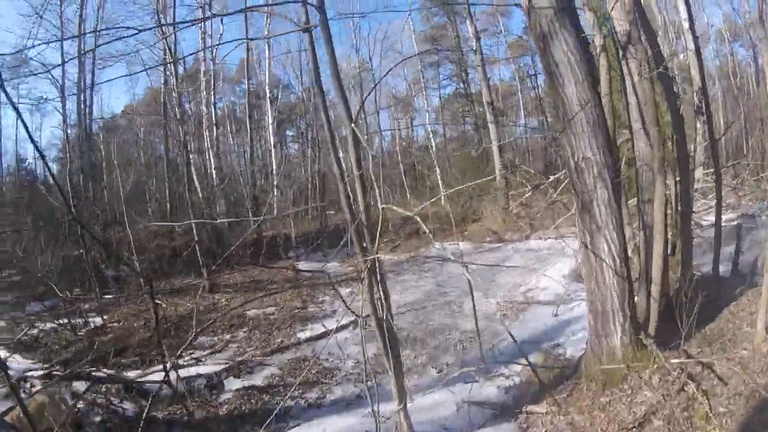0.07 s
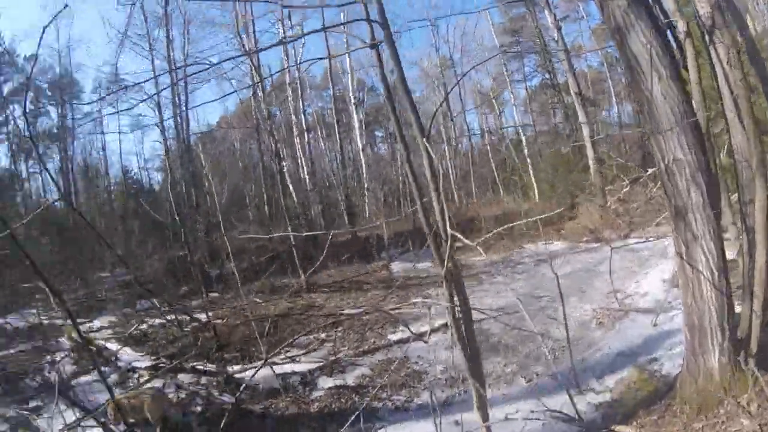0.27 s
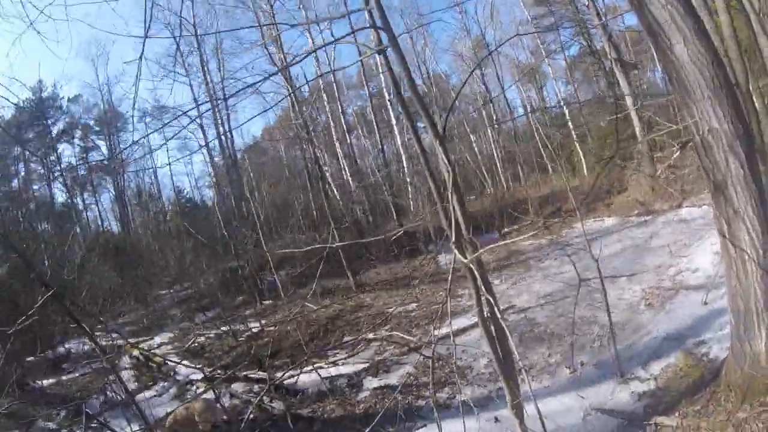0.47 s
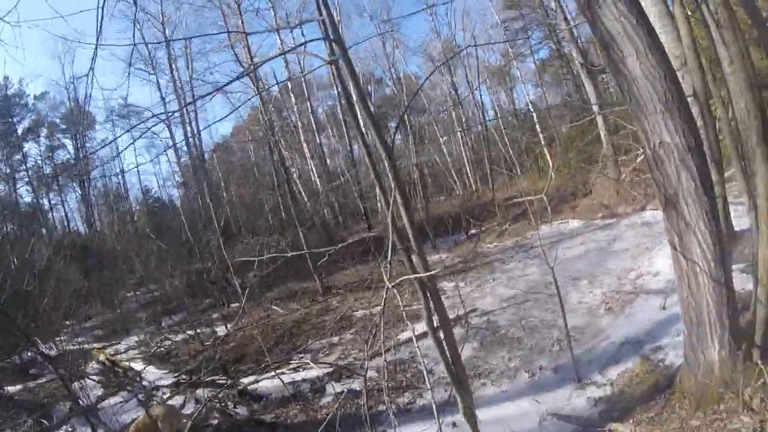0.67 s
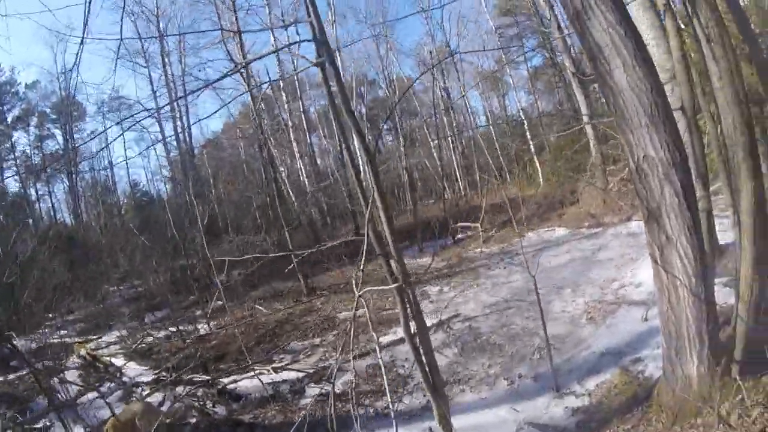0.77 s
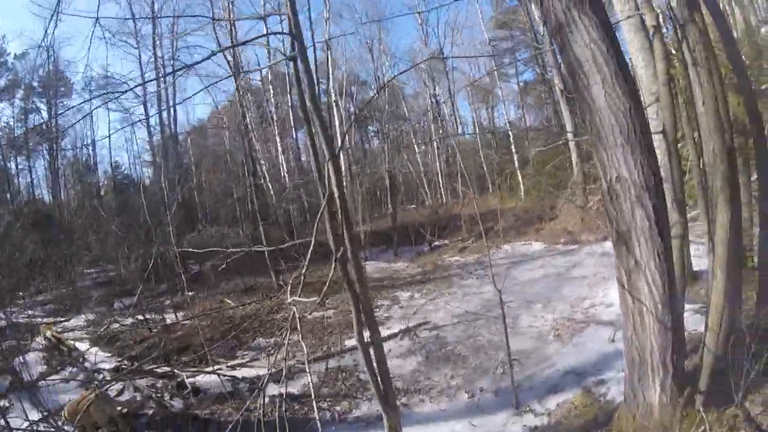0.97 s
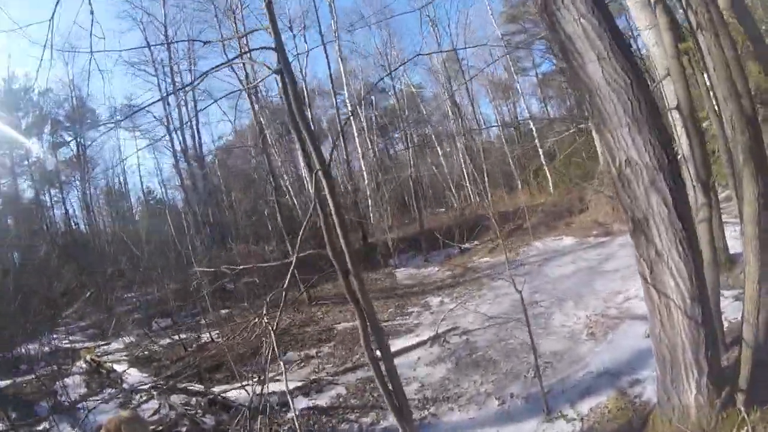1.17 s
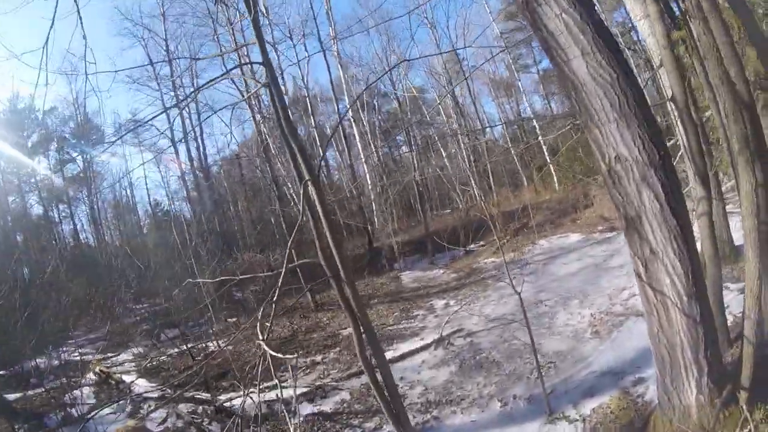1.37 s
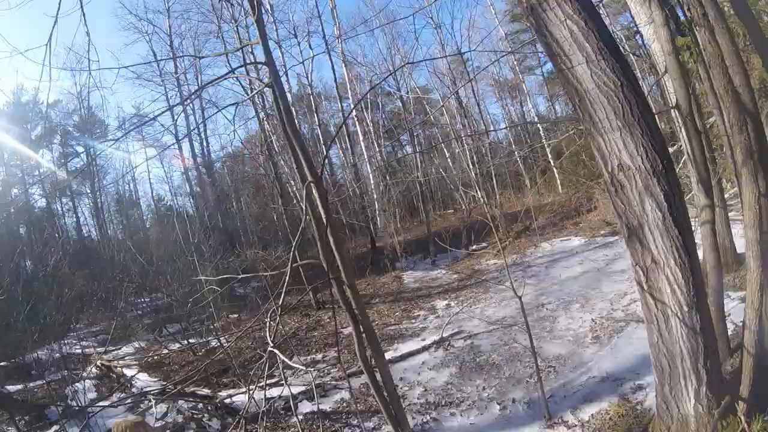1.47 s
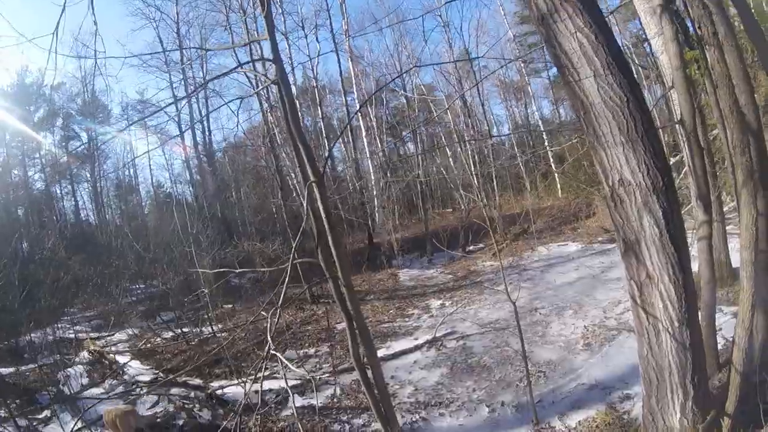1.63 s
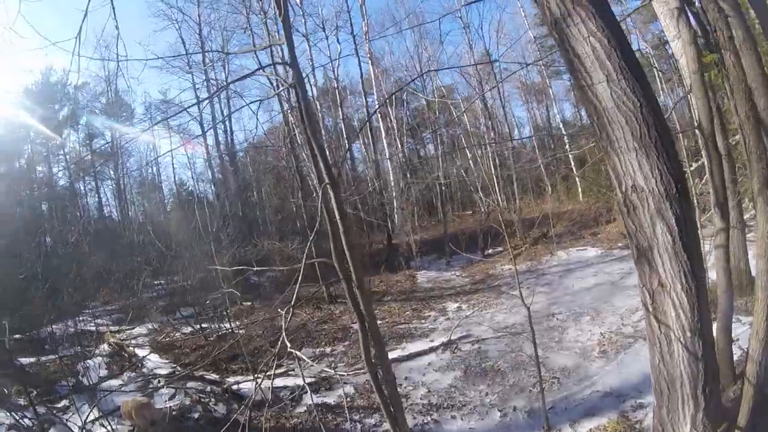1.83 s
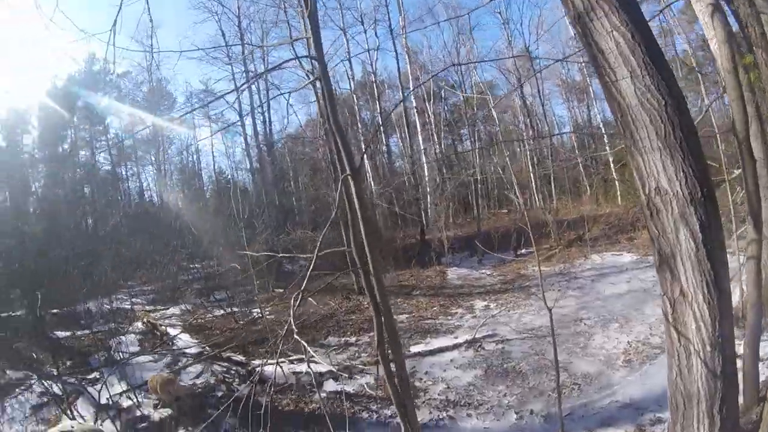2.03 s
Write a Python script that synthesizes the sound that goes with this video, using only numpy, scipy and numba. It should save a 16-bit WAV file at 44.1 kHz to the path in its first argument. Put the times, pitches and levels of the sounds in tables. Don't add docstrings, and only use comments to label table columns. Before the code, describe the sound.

Slow footsteps crunch crusted snow and dry leaves in quiet woods. Low handling thumps come around 0.1 s. At 0.25 s a step lands with a sharp snap and hollow pole clunk, then grainy crunching and rubbing until 0.55 s. A second step crackles from 0.8 to 1.1 s; thin ice cracks near 1.2 s. Sparse ticks follow, with a small knock at 1.85 s and soft thumps near 2 s.

```python
import sys
import numpy as np
from scipy import signal
from scipy.fft import rfft, irfft
from scipy.io import wavfile
from numba import njit

SR = 44100
rng = np.random.default_rng(int(sys.argv[2]) if len(sys.argv) > 2 else 0)


def linear_from_db(decibels):
    return 10 ** (np.asarray(decibels, float) / 20)


def materialize(psi):
    bounded = np.clip(np.atleast_2d(psi).T, -1, 1)
    quanta = np.round(bounded * 32767).astype(np.int16)
    wavfile.write(sys.argv[1], SR, quanta)


N = 92610


def rms_one(x):
    return x / np.sqrt(np.mean(x ** 2) + 1e-20)


def in_time(rows):
    s, *columns = np.transpose(rows)
    return [np.interp(np.arange(N) / SR, s, column) for column in columns]


def colour(x, points):
    hz, db = np.transpose(points)
    log_hz = np.log(np.maximum(np.fft.rfftfreq(N, 1 / SR), 1))
    knots_hz = [hz[0] / 2, *hz, hz[-1] * 2]
    shape_db = np.interp(log_hz, np.log(knots_hz), [db[0] - 40, *db, db[-1] - 40])
    return rms_one(irfft(rfft(x) * linear_from_db(shape_db), N))


def band(x, low_hz, high_hz):
    return signal.sosfilt(signal.butter(2, [low_hz, high_hz], "band", fs=SR, output="sos"), x)


def drift(rate_hz):
    r = np.exp(-2 * np.pi * rate_hz / SR)
    return rms_one(signal.lfilter([1], [1, -2 * r, r * r], rng.standard_normal(N + SR))[SR:])


def grains(per_s, spread_db):
    chance, size, side = rng.random((3, N))
    size_db = spread_db * np.minimum(-np.log(size + 1e-9), 4)
    return (chance < per_s / SR) * linear_from_db(size_db) * np.sign(side - .5)


def ring(x, hz, t60_s):
    r, w = linear_from_db(-60 / (t60_s * SR)), 2 * np.pi * hz / SR
    return signal.lfilter([0, np.sin(w)], [1, -2 * r * np.cos(w), r * r], x + 1e-18)


@njit
def ring_held(x, r, w):
    out = np.zeros(len(x))
    for i in range(2, len(x)):
        out[i] = np.sin(w[i]) * x[i - 1] + 2 * r[i] * np.cos(w[i]) * out[i - 1] - r[i] * r[i] * out[i - 2]
    return out


def burst(s, db, t60_s, low_hz, high_hz):
    lift_db, crack = 2.5, 6.16
    t, i = np.arange(3000) / SR, int(s * SR)
    crumble = rng.standard_normal(len(t)) * linear_from_db(-60 * t / t60_s)
    crumble[0] = crack
    noise = band(crumble, low_hz, high_hz)
    out = np.zeros(N + SR)
    out[i:i + len(t)] = linear_from_db(db + lift_db) * noise / np.abs(noise).max() / 2
    return out[:N]


def air():
    # frequency in Hz, density in dB per Hz.
    air_spectrum = [(150, -28), (260, -1.5), (395, -5.5), (4210, -17), (6500, -15.5), (12700, -28.5),
                    (14300, -41)]
    level_db = -59 + 0.54 * drift(15)
    return linear_from_db(level_db) * colour(rng.standard_normal(N), air_spectrum)


def hand():
    # time in seconds, level in dB.
    shake = [(0, -66), (.08, -43), (.13, -26), (.2, -46), (.3, -36), (.47, -35), (.65, -44), (.78, -46.5),
             (.88, -37), (1.0, -44), (1.1, -35), (1.25, -39), (1.38, -48.5), (1.5, -53.5), (1.75, -52.5),
             (1.93, -49), (2.0, -40), (2.1, -42)]
    # start in seconds, peak in dB, length in seconds, direction (+1 push, -1 pull).
    thumps = [(0.091, -22.5, 0.0034, -1), (0.113, -21.5, 0.0075, -1), (0.140, -16.5, 0.01, -1),
              (0.159, -25, 0.013, -1), (1.409, -26, 0.012, 1), (1.918, -24.5, 0.0096, 1),
              (1.9715, -21.5, 0.0051, -1), (1.987, -28, 0.0086, -1), (2.002, -29, 0.0072, -1),
              (2.049, -21, 0.0082, 1), (2.074, -28, 0.011, -1)]
    lump_db, low_hz, top_hz = 3.5, 27, 117.3
    shake_db, = in_time(shake)
    white = rng.standard_normal(N + SR)
    rumble = rms_one(band(band(white, low_hz, top_hz), 2.6, 277)[SR:])
    out = linear_from_db(shake_db - 1 + lump_db * drift(5.4)) * rumble
    t = np.arange(N) / SR
    for s, peak_db, length_s, direction in thumps:
        u = np.clip((t - s) / length_s, 0, 2)
        pulse = np.sin(np.pi * u) * np.sin(np.pi * u / 2) * np.exp(-.6 * u)
        out += np.sign(direction) * linear_from_db(peak_db) * pulse
    return out


def squeeze():
    # time in seconds, loss of upper modes in dB, loss of low modes in dB.
    grips = [(0.267, 14, 2), (.31, -6, -4.5), (0.353, 9, 10), (.41, -3, 0.5), (0.456, 3, 2.5),
             (0.504, 13, 0.5), (0.825, 7.5, 19), (0.932, 9, 6), (1.0, 5, 5), (1.066, 20, 10),
             (1.131, 8, -5), (1.165, 8, -2), (1.252, 11, 2)]
    width_s = 0.004
    t = np.arange(N) / SR
    bumps = np.array([np.exp(-.5 * ((t - s) / width_s) ** 2) for s, *loss in grips])
    bumps /= width_s * SR * np.sqrt(2 * np.pi)
    return np.maximum(np.transpose(grips)[1:], 0) @ bumps


def pole():
    # frequency in Hz, level in dB, t60 in seconds.
    modes = [(113.2, -13, 0.32), (182.8, -8.5, 0.52), (233.8, 1.5, 0.19), (284, 1, 0.1), (462.9, -3, 0.23),
             (449, -16.5, 0.23), (620, -6.5, 0.029), (721, -8.5, 0.05), (898, -16.5, 0.071),
             (1040, -11.5, 0.021), (1253, -19, 0.037), (1754, -14, 0.056), (2020, -22.5, 0.044),
             (2460, -13, 0.028)]
    # time in seconds, peak in dB, low end relative in dB, top end relative in dB.
    jolts = [(0.244, -9.5, -1.5, 2), (0.278, -11.5, -1, 8), (0.348, -27, -12, -4), (0.364, -20, -22, -26),
             (0.389, -20, -22, 12), (0.417, -31.5, -18, 13), (0.44, -40, -16, 15), (0.45, -25.5, 2, 8),
             (0.461, -15.5, -31, 3.5), (0.472, -15.5, -21, -5), (0.513, -33, -17, -28),
             (0.812, -18, -11.5, 9.5), (0.868, -36.5, -16, 12), (0.882, -20, -14, -6),
             (0.899, -24, -9.5, -16), (0.92, -22, -22, 4.5), (1.022, -25.5, -26, 11.5),
             (1.091, -11.5, -56, 6.5), (1.135, -24, -14, 4), (1.194, -27.5, -14, 10),
             (1.206, -22.5, -12.5, -2), (1.2169, -23, -10.5, -2), (1.262, -37.5, -0.5, 11),
             (1.715, -39, -14, -3), (1.765, -38.5, -25, 0), (1.8572, -22, -13, 1.5)]
    # time in seconds, level in dB, hum and top end relative in dB.
    rub = [(0, -67.5, 3, -2), (.16, -49, 16, 10.5), (.2, -65, -3, 23), (.25, -39, 11, 18),
           (.38, -24.5, -2, 5), (.44, -41, 8, 18), (.47, -41.5, 6, 24.5), (.51, -84, 3, -18),
           (.68, -61, 12, 13), (.79, -48.5, 5.5, -5), (.9, -31.5, 2, 8.5), (.98, -38.5, -3, 5),
           (1.07, -38.5, 5, 10.5), (1.215, -41, -6.5, 6), (1.36, -55, 1.5, 17), (1.42, -78, 7, 16.5),
           (1.75, -55, 6.5, 14.5), (1.85, -68.5, 15, 26)]
    # time in seconds, level in dB.
    plucks = [
        (.246, -8.5),
        (.362, -12),
        (0.469, -21),
        (.885, -26),
        (1.096, -22),
    ]
    hum_hz, low_end_hz, top_end_hz, thin_hz = 200, 330, 560, 1200
    jolt_lift_db, jolt_spread_db, jolt_cut_hz = -2, 1.5, 603
    hum_jolt_db, thin_jolt_db = -6.5, -1
    rubs_per_s, rub_spread_db, rub_body_db, thin_rub_db = 700, 5, -7, 4.5
    wobble, wobble_hz = 0.01, 7

    s, jolt_db, low_db, top_db = np.transpose(jolts)
    rub_db, rub_hum_db, rub_top_db = in_time(rub)
    rubs = [rms_one(grains(rubs_per_s, rub_spread_db)) * linear_from_db(rub_db - 25 + 0.28 * drift(34))
            for side in range(2)]
    chance = rng.standard_normal((len(s), len(modes)))
    upper_loss_db, low_loss_db = squeeze()
    wander = 1 + wobble * drift(wobble_hz)
    out, sign, last_hz = np.zeros(N), 1, 1
    for k, (hz, mode_db, t60_s) in enumerate(modes):
        low, top = 150 < hz < low_end_hz, hz > top_end_hz
        hum, thin = low and hz < hum_hz, hz > thin_hz
        if hz < hum_hz:
            share_db = rub_hum_db
        elif low:
            share_db = rub_body_db
        else:
            share_db = top * rub_top_db + thin * thin_rub_db
        drive = rubs[k % 2] * linear_from_db(share_db)
        hit_db = jolt_db + jolt_lift_db + low * low_db + top * top_db
        hit_db = hit_db + hum * hum_jolt_db + thin * thin_jolt_db + jolt_spread_db * chance[:, k]
        drive[(s * SR).astype(int)] -= linear_from_db(hit_db)
        for pluck_s, pluck_db in plucks:
            drive[int(pluck_s * SR)] += hum * linear_from_db(pluck_db)
        if hz > 1.1 * last_hz:
            sign = -sign
        last_hz = hz
        loss_db = low_loss_db if hz < low_end_hz else upper_loss_db
        decay = linear_from_db(-60 / (t60_s * SR) - loss_db)
        out += sign * linear_from_db(mode_db) * ring_held(drive, decay, 2 * np.pi * hz / SR * wander)
    return signal.lfilter(*signal.butter(1, jolt_cut_hz, fs=SR), out)


def plate():
    # time in seconds, level in dB.
    cracks = [
        (1.193, -24),
        (1.203, -26),
        (1.213, -35.5),
        (1.226, -33.5),
        (1.237, -38.5),
    ]
    # frequency in Hz, level in dB, t60 in seconds.
    plate_modes = [(2434, 6.5, 0.019), (3970, -2, 0.0079), (1693, -1, 0.031), (5170, -5, 0.008),
                   (1327, -3, 0.033)]
    s, db = np.transpose(cracks)
    clicks = np.zeros(N)
    clicks[(s * SR).astype(int)] = linear_from_db(db - 4.5)
    out = np.zeros(N)
    for k, (hz, mode_db, t60_s) in enumerate(plate_modes):
        out += (-1) ** k * linear_from_db(mode_db) * ring(clicks, hz, t60_s)
    return out


def snaps():
    # time in seconds, dull peak in dB, bright relative in dB, dull pitch in octaves above 1 kHz.
    breaks = [(0.1343, -34, 11, 0.89), (0.2451, -19, 0, 1.35), (0.2777, -15, -17, 0.98),
              (0.373, -25.5, -3, 1.9), (0.4184, -21, 8.5, 0.97), (0.4605, -26, -28, 0.79),
              (0.5187, -27, -0.5, 1.76), (0.5407, -26.5, 2.5, 0.4), (0.8109, -15.5, -12.5, 1.38),
              (0.812, -19, -39, 0.4), (0.822, -47, -29, 1.5), (0.8294, -30.5, -21, 1.6),
              (0.872, -43, 9, 1.3), (0.8897, -23, -5, 0.96), (0.9182, -24, 1, 0.79), (0.951, -28, 9.5, 2.2),
              (1.092, -18.5, -16, 0.9), (1.265, -25.5, -22, 1.1), (1.2805, -37.5, 9, 1.4),
              (1.2913, -31.5, -4, 1.9), (1.3084, -45.5, 24, 1.0), (1.6557, -37, 19, 0.98),
              (1.8403, -31.5, 2.5, 2.13), (1.858, -28.5, -25, 0.97), (1.9992, -30, -1.5, 1.03)]
    # time in seconds, peak in dB, pitch in Hz.
    ticks = [(0.323, -23, 1980), (.410, -22, 5400), (.435, -17.5, 2800), (.493, -21, 8500),
             (.521, -35, 1300), (0.598, -33, 3565), (.702, -24.5, 4900), (0.7303, -26.5, 2950),
             (.780, -25.5, 2780), (.854, -48, 5420), (0.883, -20, 2500), (0.907, -17, 6600),
             (.918, -11.5, 1900), (.959, -25, 1500), (0.973, -29, 3500), (0.982, -35, 1600),
             (1, -22.5, 1300), (1.0164, -43, 6420), (1.034, -37, 2800), (1.1464, -32, 6580),
             (1.152, -25, 2060), (1.2632, -25, 6430), (1.269, -32, 2200), (1.324, -20, 8500),
             (1.337, -27.5, 2160), (1.482, -35, 2560), (1.537, -29.5, 2970), (1.593, -32.5, 2600),
             (1.63, -31.5, 1110), (1.703, -33.5, 1280), (1.782, -29, 3930)]
    tick_s, tick_ratio = 0.0099, 2 ** 0.59
    snap_s, snap_ratio = 0.032, 2 ** 0.35
    out = np.zeros(N)
    for s, db, hz in ticks:
        out += burst(s, db, tick_s, hz / tick_ratio, hz * tick_ratio)
    for s, db, bright_db, octave in breaks:
        hz = 1000 * 2 ** octave
        out += burst(s, db, snap_s, hz / snap_ratio, hz * snap_ratio)
        out += burst(s, db + bright_db, snap_s, 4660, 8500)
    return signal.lfilter(*signal.butter(2, 8000, fs=SR), out)


def crunch():
    # time in seconds, bright crunch in dB, dull crunch relative in dB.
    tread = [(0, -60.5, -4), (.13, -51.5, -8), (.27, -57, 19.5), (.40, -51.5, 6.5), (.43, -44.5, 2),
             (.56, -51, -1.5), (.62, -54, -3), (.83, -56.5, 0.5), (.89, -42.5, 4), (.96, -43, 2),
             (1.1, -49.5, 2.5), (1.18, -53.5, -0.5), (1.27, -60, 16.5), (1.36, -62, 4), (1.63, -59, 1),
             (1.68, -53.5, -18), (1.93, -79.5, 5), (2.08, -56.5, -2)]
    # frequency in Hz, density in dB per Hz.
    bright_spectrum = [(3300, -7.5), (4200, -18), (5200, -6), (7500, -9), (9600, -14), (11000, -32),
                       (13200, -30), (14300, -44)]
    # frequency in Hz, density in dB per Hz.
    dull_spectrum = [(500, -3.5), (900, -11.5), (1700, -12.5), (2600, -13), (3600, -24.5), (5000, -17)]
    grains_per_s, spread_db, clump_db = 2000, 1, 1.5
    bright_db, dull_db = in_time(tread)
    clump = linear_from_db(bright_db + clump_db * drift(24))
    shared = grains(grains_per_s, spread_db)
    bright = colour(shared, bright_spectrum)
    dull = colour(shared + grains(grains_per_s, spread_db), dull_spectrum)
    return clump * (bright + dull * linear_from_db(dull_db + 2 * drift(57)))


def scene():
    return (air() + hand() + pole() + plate() + snaps() + crunch())[None]


def top_cut(x):
    return signal.sosfilt(signal.butter(12, 14700, fs=SR, output="sos"), x)


def record(dry):
    port_hz, port_width_hz, port_db, cutoff_hz = 6517, 225, 7.5, 14600
    r, w = np.exp(-np.pi * port_width_hz / SR), 2 * np.pi * port_hz / SR
    port = signal.lfilter([(1 - r * r) / 2, 0, (r * r - 1) / 2], [1, -2 * r * np.cos(w), r * r], dry)
    low_pass = signal.cheby2(10, 60, cutoff_hz, fs=SR, output="sos")
    return top_cut(signal.sosfilt(low_pass, dry + linear_from_db(port_db) * port))


dry = scene()
out = record(dry)
materialize(out)
```